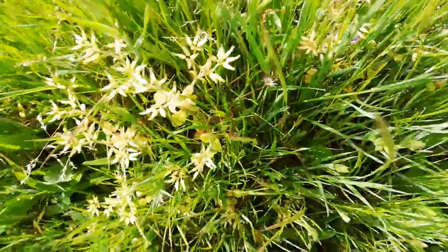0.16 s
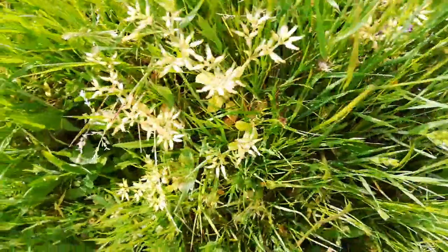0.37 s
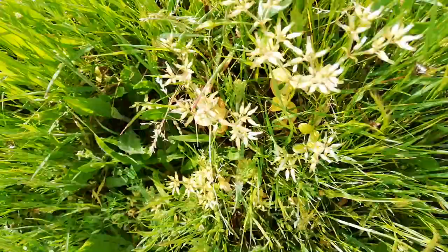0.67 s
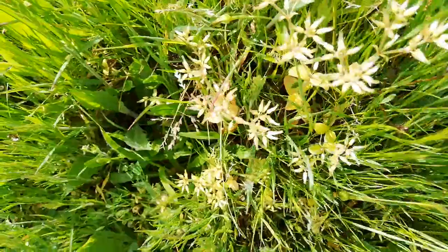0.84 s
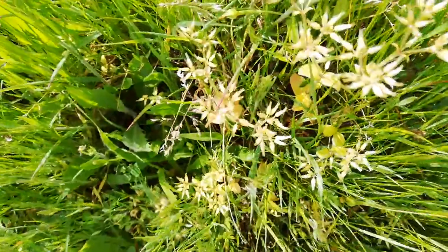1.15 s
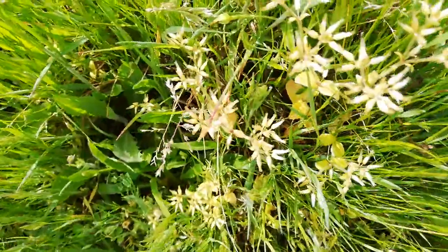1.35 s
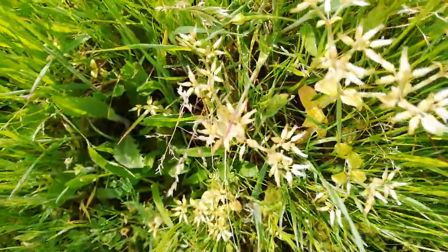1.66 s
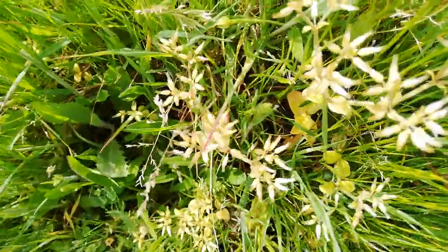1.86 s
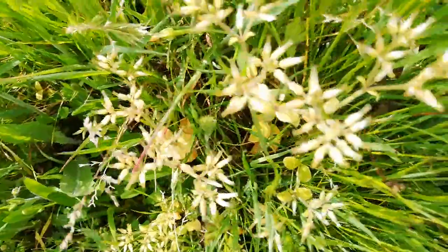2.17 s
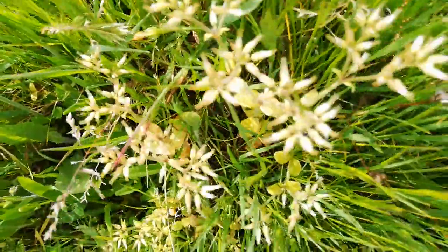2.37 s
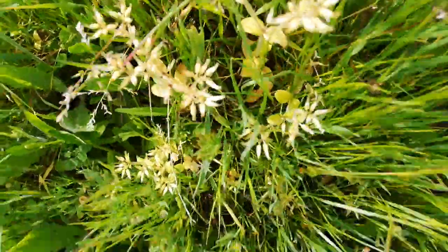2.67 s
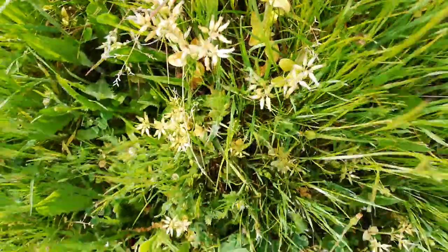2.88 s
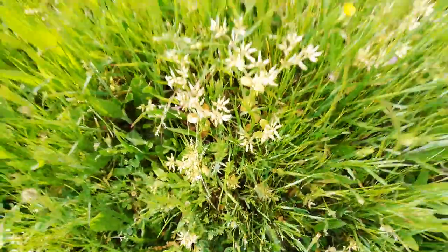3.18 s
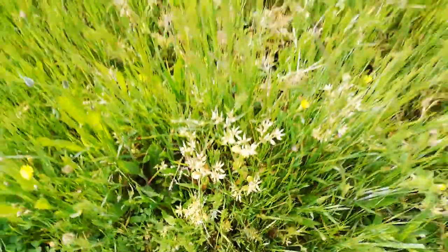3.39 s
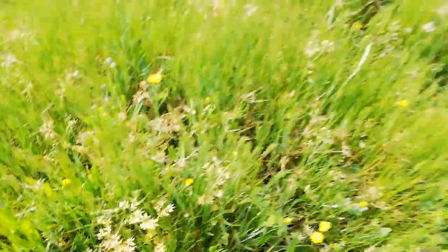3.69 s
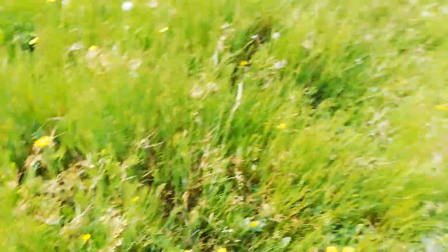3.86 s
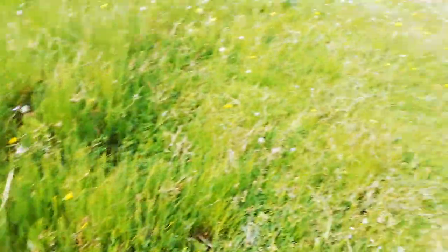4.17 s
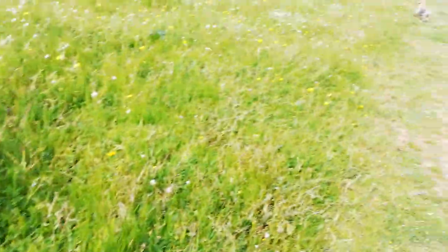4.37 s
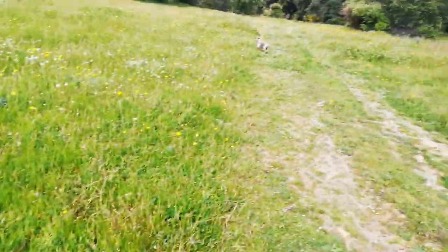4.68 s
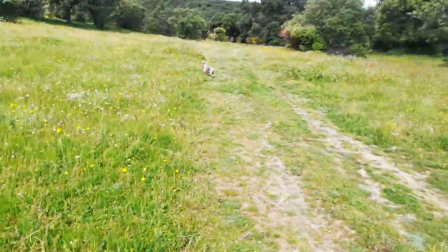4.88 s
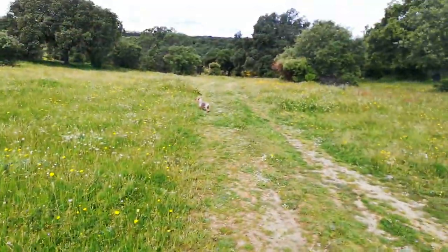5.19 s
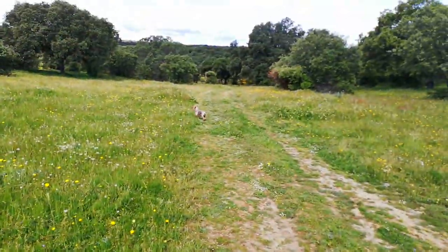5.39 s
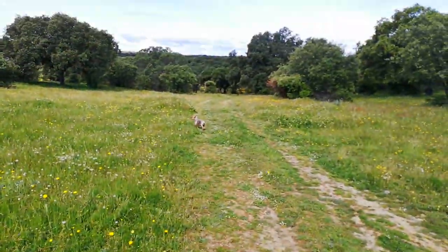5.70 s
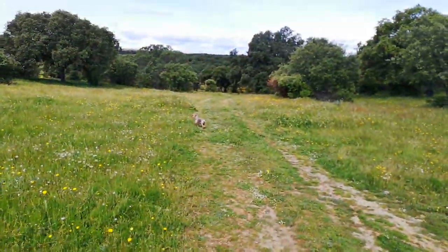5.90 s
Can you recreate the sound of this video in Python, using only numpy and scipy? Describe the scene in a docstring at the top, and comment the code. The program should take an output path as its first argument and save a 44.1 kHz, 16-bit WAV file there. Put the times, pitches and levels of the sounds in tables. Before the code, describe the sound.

In an open meadow, several nearby crickets give quick, overlapping high chirps above a shimmering distant chorus. Wind rumbles and flaps against the microphone, dropping briefly around two seconds. Near the middle, grass swishes with a small knock and a deep thump as the microphone turns. Then the wind mostly fades, the crickets become louder, and faint birds whistle far away.

```python
"""A meadow: field crickets sing all over it, each chirp a few wing strokes, each stroke a falling tone near 5
kHz. Near singers, scattered by the grass, stand out of a distant chorus of many such strokes. Wind is shaped
noise that buffets the microphone, with slaps; a few soft low thuds come apart from it; far birds whistle in
bent sines. The grass swishes twice in crackling noise as someone turns in it, with one soft knock, over a faint
hiss."""
import sys
import numpy as np
from scipy import signal
from scipy.fft import rfft, irfft, next_fast_len
from scipy.io import wavfile
from scipy.ndimage import map_coordinates

SR = 44100
rng = np.random.default_rng(int(sys.argv[2]) if len(sys.argv) > 2 else 0)


def bounce(signal):
    """Save signal as a 16-bit WAV file at the path given by the first command-line argument."""
    frames = np.transpose(np.atleast_2d(signal))
    limited = np.clip(frames, -1, 1)
    pcm = np.round(limited * 32767).astype(np.int16)
    wavfile.write(sys.argv[1], SR, pcm)


N = 266540

# level of the far crickets' tones, which the hiss partly follows: time_s, level_db
CHORUS_LEVEL = [(0.0, -42.5), (.8, -45), (1.9, -47.5), (3.2, -45.5), (4.35, -33.5), (4.65, -39), (5.1, -36),
                (5.55, -37.5), (5.68, -43), (6.04, -34.5)]


def amp(db):
    """Decibels to gain."""
    return 10 ** (np.asarray(db) / 20)


def unit(x):
    """Scale to rms 1."""
    return x / np.sqrt(np.mean(x ** 2) + 1e-20)


def curves(rows):
    """One value per sample for each column after the time."""
    time_s, *columns = np.transpose(rows)
    return [np.interp(np.arange(N) / SR, time_s, column) for column in columns]


def wobble(rate_hz):
    """A smooth random curve with rate_hz knots a second."""
    knots = rng.standard_normal(int(N * rate_hz / SR) + 4)
    return map_coordinates(knots, [np.arange(N) * rate_hz / SR])


def swell_at(middle_s, width_s):
    """A Gaussian rise to 1 and fall; width_s is its standard deviation."""
    return np.exp(-.5 * ((np.arange(N) / SR - middle_s) / width_s) ** 2)


def filtered(x, response):
    """Multiply the spectrum of x by a response of frequency in Hz."""
    size = next_fast_len(N + SR // 2)
    gain = response(np.fft.rfftfreq(size, 1 / SR))
    return irfft(rfft(x, size) * gain, size)[..., :N]


def noise(spectrum, alike):
    """Stereo noise of rms 1; alike runs from -1 (opposed) to 1 (mono)."""
    knot_hz, knot_db = np.transpose(spectrum)

    def response(hz):
        return amp(np.interp(np.log(hz + 1), np.log(knot_hz), knot_db))

    common, side = filtered(rng.standard_normal((2, N)), response)
    turn = np.arccos(np.clip(alike, -1, 1)) / 2
    return unit(np.cos(turn) * common + np.sin(turn) * np.array([side, -side]))


def add(track, start_s, sound):
    """Mix a sound into a track, cut at the track's ends."""
    start = round(start_s * SR)
    lo, hi = max(start, 0), min(start + sound.shape[-1], N)
    if hi > lo:
        track[..., lo:hi] += sound[..., lo - start:hi - start]


def scattered(x, wet_db, t60_s):
    """The direct sound plus diffuse echoes, different at each ear."""
    t = np.arange(SR // 4) / SR
    tail = rng.standard_normal((2, len(t))) * amp(-60 * t / t60_s)
    paths = amp(wet_db) * tail / np.linalg.norm(tail[0])
    paths[:, 0] += 1  # direct path
    return signal.fftconvolve(np.atleast_2d(x), paths, axes=1)


def stroke(pitch_hz, length_s, fall, sag):
    """Phase and swell of one wing closure: the pitch falls ever faster as the scraper slows along the file."""
    u = np.linspace(-1, 1, int(length_s * SR))
    hz = pitch_hz * (1 - fall * u - sag * u * u * (1 + u))
    phase = 2 * np.pi * np.cumsum(hz) / SR
    return phase, np.cos(np.pi * u / 2) ** 2


def upper_resonance(hz, centre_hz=10230, width_hz=260):
    """The wing radiates its octave best around one frequency."""
    return 1 / np.hypot(1, (hz - centre_hz) / width_hz)


def flutter(size, rate_hz=330):
    """The scraper's grip varies within a stroke: a smooth random curve."""
    return map_coordinates(rng.standard_normal(32), [np.arange(size) * rate_hz / SR], mode="mirror")


def chirp(count, period_s, pitch_hz, octave_db, third_db, rasp_db, length_s=.026):
    """A few strokes, the first usually weaker; the wing adds overtones and the file a faint rasp."""
    song = np.zeros((2, SR // 4))
    lead = rng.normal(0.73, 0.4) * np.array([[1], [-1]])  # phase offset between the ears, radians
    file_band = signal.butter(2, [6200, 8800], "bandpass", fs=SR)
    for k in range(count):
        stroke_hz = pitch_hz * (1.0096 + rng.normal(0, 0.0046))
        phase, swell = stroke(stroke_hz, length_s, fall=0.0712, sag=0.048)
        hz = np.gradient(phase) * SR / (2 * np.pi)
        grip_db = 1.4 * flutter(len(phase))
        phase = phase + .3 * flutter(len(phase))
        tone = np.sin(phase + lead)
        octave_gain = amp(octave_db + grip_db) * upper_resonance(2 * hz, width_hz=190)
        octave = octave_gain * np.sin(2 * phase + lead)
        third = amp(octave_db + third_db) * np.sin(3 * phase + lead)
        scrape = signal.lfilter(*file_band, rng.standard_normal((2, len(phase))))
        rasp = amp(octave_db + rasp_db + 2 * grip_db) * scrape
        size = amp(-5 * (k == 0) + rng.normal(2.28, 1.0) + grip_db) * np.sqrt(2)
        add(song, k * period_s, size * swell * (tone + octave + third + rasp))
    return song


def near_crickets():
    """Each cricket has its pitch and pace; grass scatters its chirps, which shift as the microphone turns."""
    # chirps: first_stroke_middle_s, singer, strokes, level_db (nominal, louder side, before scattering)
    chirps = [(.018, "low", 4, -32.5), (.045, "middle", 3, -30.5), (.21, "low", 3, -34),
              (.247, "middle", 4, -29.5), (.414, "middle", 5, -26.5), (.514, "low", 3, -33),
              (.587, "middle", 4, -26.5), (.697, "low", 4, -30), (.779, "middle", 4, -28),
              (.787, "high", 4, -28), (.954, "low", 3, -32.5), (.98, "high", 4, -24),
              (.983, "middle", 3, -34.5), (1.171, "high", 4, -30.5), (1.172, "low", 3, -29),
              (1.356, "low", 4, -27.5), (1.567, "low", 4, -28), (1.785, "high", 3, -32.5),
              (1.815, "low", 3, -26.5), (1.96, "high", 4, -35), (2.068, "low", 3, -31),
              (2.166, "high", 4, -35), (2.29, "low", 3, -35.5), (2.358, "high", 4, -38),
              (2.489, "middle", 4, -38), (2.521, "low", 3, -35), (2.584, "high", 3, -34.5),
              (2.729, "low", 3, -32.5), (2.773, "high", 3, -31), (2.932, "low", 3, -33.5),
              (3.0, "high", 3, -32.5), (3.02, "middle", 3, -36.5), (3.151, "low", 3, -30),
              (3.26, "middle", 3, -31.5), (3.35, "middle", 4, -32), (3.366, "low", 3, -31),
              (3.448, "high", 3, -36), (3.555, "middle", 4, -25), (3.686, "high", 4, -32.5),
              (3.803, "low", 3, -24), (3.884, "high", 3, -30), (3.983, "low", 4, -26.5),
              (4.11, "high", 3, -27.5), (4.188, "low", 3, -29.5), (4.278, "high", 4, -27),
              (4.406, "middle", 4, -21.5), (4.52, "high", 3, -31.5), (4.687, "middle", 4, -25.5),
              (4.748, "high", 3, -29.5), (4.835, "deep", 4, -30.5), (4.918, "high", 4, -29.5),
              (5.099, "low", 4, -26), (5.146, "high", 3, -29), (5.241, "deep", 4, -28.5),
              (5.337, "middle", 4, -25.5), (5.345, "low", 3, -24.5), (5.454, "deep", 3, -34),
              (5.523, "middle", 4, -25), (5.53, "low", 4, -25), (5.71, "middle", 3, -21.5),
              (5.771, "low", 3, -24), (5.857, "middle", 4, -26), (5.941, "high", 4, -22.5)]
    # singers by name: pitch_hz (nominal), stroke_period_s, octave_db (nominal, relative to the tone),
    # left_over_right_db before the turn, left_over_right_db after it
    singers = {"high": (5241.5, .0332, -20.5, 4, -2.5), "middle": (5113.5, .0315, -16.5, -14, -7),
               "low": (5038, .0315, -9.5, 5, -2), "deep": (4899, .028, -5, -3, -6.5)}
    turn_s, turn_length_s = 4.0, 0.52
    # as the microphone swings, the high singer's octave stands out
    lift_s, lift_width_s, peak_lift_db = 4.46, 0.67, 17
    out = np.zeros((2, N))
    lift_db = peak_lift_db * swell_at(lift_s, lift_width_s)
    for s, singer, strokes, db in chirps:
        pitch_hz, period_s, octave_db, before_db, after_db = singers[singer]
        if singer == "high":
            octave_db = octave_db + lift_db[round(s * SR)]
        pan_db = np.interp(s, [turn_s, turn_s + turn_length_s], [before_db, after_db])
        song = chirp(round(strokes), period_s, pitch_hz, octave_db, third_db=-30.5, rasp_db=-18.5)
        sides = amp([[min(pan_db, 0)], [min(-pan_db, 0)]])
        add(out, s - .013, amp(db) * sides * scattered(song, wet_db=-6.0, t60_s=0.05))  # half a stroke early
    return out


def far_crickets(count=11):
    """Many crickets, each with its own pitch and pace, merge into a shimmering band."""
    octave_db = -5.5  # relative to the tones
    tones, octaves = np.zeros((2, N)), np.zeros((2, N))
    for pitch_hz in np.linspace(4620, 5300, count):
        period_s, repeat_s = rng.uniform(.029, .035), rng.uniform(.22, .34)
        for s in np.arange(-rng.uniform(0, repeat_s), N / SR, repeat_s):
            phase, swell = stroke(pitch_hz * rng.normal(1, 0.01034), length_s=0.0222, fall=0.0734, sag=0.057)
            phase = phase + rng.uniform(0, 2 * np.pi, (2, 1))
            tone_size, octave_size = amp(rng.normal(0, 4.8, (2, 2, 1)))
            tone = tone_size * swell * np.sin(phase)
            octave = octave_size * swell ** 2 * np.sin(2 * phase)
            gaps_s = period_s * rng.normal(1, .04, size=4)
            for start_s in s + rng.normal(0, .02) + np.cumsum(gaps_s):
                add(tones, start_s, tone)
                add(octaves, start_s, octave)
    tones = filtered(tones, lambda hz: 1 / np.hypot(1, (hz - 5060) / 450))  # the wing's main resonance
    octaves = filtered(octaves, lambda hz: upper_resonance(hz, width_hz=660))
    tones = unit(scattered(tones, wet_db=-8.5, t60_s=0.041)[:, :N])
    octaves = unit(scattered(octaves, wet_db=-3.5, t60_s=0.034)[:, :N])  # short waves scatter more in grass
    return amp(curves(CHORUS_LEVEL)[0]) * (tones + amp(octave_db) * octaves)


def wind():
    """Slow buffets push both ports together; finer eddies grow faster with wind strength and push in opposition."""
    # breeze at the microphone: time_s, strength_db
    breeze = [(0.0, -29.5), (.4, -27), (1.1, -29.5), (1.7, -33), (1.93, -47.5), (2.47, -50), (2.52, -29.5),
              (2.74, -34.5), (3.05, -33.5), (3.45, -27.5), (3.9, -26), (3.96, -33.5), (4.38, -39),
              (4.55, -56.5), (5.2, -58), (5.48, -83), (6.04, -88)]
    # gusts on top of it: middle_s, width_s, rise_db
    gusts = [(0.222, 0.021, 8.5), (0.336, 0.026, 4.5), (0.773, .03, 2.5), (0.928, 0.024, 3),
             (1.585, 0.016, 4.5), (2.246, 0.032, 9), (2.868, 0.052, 6), (3.161, 0.03, 8),
             (3.423, 0.043, 5.5), (3.872, 0.018, 4.5), (4.223, 0.02, 0.5), (4.38, 0.0099, 11),
             (4.766, 0.021, 16.5), (4.89, 0.044, 16), (5.643, 0.078, 27.5)]
    # buffet spectrum: frequency_hz, density_db (relative)
    buffet_spectrum = [(18, -16), (35, -1), (70, 3), (130, 5.5), (190, -2.5), (260, -15.5), (400, -35.5),
                       (700, -96)]
    # eddy spectrum: frequency_hz, density_db (relative)
    eddy_spectrum = [(90, -56), (170, 1.5), (260, 4), (400, -12.5), (650, -26.5), (1200, -43.5),
                     (2500, -81), (5000, -100)]
    # sudden slaps of wind, peaking 4 ms after time_s: time_s, envelope_peak_db
    slap_peaks = [(0.234, -28.5), (0.517, -40), (0.79, -37.5), (0.925, -32.5), (3.399, -33), (3.462, -34),
                  (3.493, -28), (3.594, -30), (3.864, -44)]
    steady_db = -29.5  # the usual strength
    # levels at the usual strength, and dB gained per dB of wind
    eddy_db, eddy_growth = -38.5, 2
    sway_db, sway_growth = -37.5, 0.41
    body_hz, body_growth = 137, 0.15  # buffets above body_hz grow more: weak wind is duller

    strength_db = curves(breeze)[0] + sum(db * swell_at(s, width_s) for s, width_s, db in gusts)
    excess_db = strength_db - steady_db

    sway_noise = noise([(12, -9), (25, -4), (65, -1), (120, -12), (300, -95)], alike=0.88)
    sway = amp(sway_db + sway_growth * excess_db + 2 * wobble(14)) * sway_noise

    push = noise(buffet_spectrum, alike=0.79)
    deep = filtered(push, lambda hz: 1 / (1 + (hz / body_hz) ** 4))
    body = deep + amp(body_growth * excess_db) * (push - deep)
    buffet = amp(strength_db + 2.56 * wobble(25)) * body

    eddy_level_db = eddy_db + eddy_growth * excess_db + 4.3 * wobble(55)
    eddies = amp(eddy_level_db) * noise(eddy_spectrum, alike=-0.42)

    t = np.arange(N) / SR
    slap_envelope = sum(amp(db) * np.exp(-np.abs(t - s - .004) / 0.0029) for s, db in slap_peaks)
    slap_noise = noise([(100, -19), (280, 6.5), (800, -1), (1400, -21), (3000, -69)], alike=-0.2)
    return sway + buffet + eddies + slap_envelope * slap_noise


def meadow_hiss():
    """Faint shaped noise, wavering and slightly following the far chorus level."""
    # hiss spectrum: frequency_hz, density_db (relative)
    hiss_spectrum = [(30, 6), (120, -28), (300, -1.5), (600, -11), (1200, -5.5), (3000, -6.5), (4200, -5.5),
                     (6000, 3.5), (6800, 1), (7800, -7.5), (11000, 1), (13000, -21), (15500, -6)]
    level_db = -60.5 + 0.21 * (curves(CHORUS_LEVEL)[0] + 46.5) + 1.8 * wobble(12)
    return amp(level_db) * noise(hiss_spectrum, alike=0.039)


def whistle(length_s, first_hz, middle_hz, last_hz):
    """A pure note that bends through three pitches."""
    u = np.linspace(0, 1, int(length_s * SR))
    bend = np.polyfit([0, .5, 1], [first_hz, middle_hz, last_hz], 2)
    phase = 2 * np.pi * np.cumsum(np.polyval(bend, u)) / SR
    return np.sqrt(2) * np.abs(np.sin(np.pi * u)) ** 0.65 * np.sin(phase)


def birds(count=9):
    """Far birds, echoed by the trees: single whistles and a second bird's even run of falling notes."""
    # single whistles: start_s, shape, middle_pitch_hz, level_db (before echoes and side gains)
    whistles = [(.08, "pip", 3570, -64), (.073, "dip", 2290, -67), (.235, "pip", 3860, -61),
                (.335, "dip", 2320, -70), (0.468, "pip", 3870, -58.5), (.499, "pip", 3900, -64),
                (.582, "dip", 2180, -69), (.728, "rise", 2230, -76.5), (2.755, "fall", 2950, -65),
                (3.625, "pip", 3050, -61), (3.7, "rise", 2280, -61), (4.28, "rise", 4060, -54),
                (4.395, "fall", 2720, -53), (4.852, "arch", 3160, -59.5), (5.002, "arch", 3090, -56),
                (5.122, "fall", 1676, -68), (5.148, "arch", 3130, -55.5), (5.27, "fall", 1700, -68),
                (5.291, "arch", 3120, -56)]
    # note shapes by name: length_s, first_pitch_ratio, last_pitch_ratio (both to the middle pitch)
    notes = {"pip": (0.033, 0.95, 1), "dip": (0.0347, 1.18, .97), "fall": (.031, 1.08, 0.82),
             "rise": (.06, .94, 1.22), "arch": (.062, 0.63, .76)}
    run_s, run_period_s, run_db = 5.04, .1045, -63
    song = np.zeros(N)
    for s, shape, hz, db in whistles:
        length_s, first_ratio, last_ratio = notes[shape]
        add(song, s, amp(db) * whistle(length_s, first_ratio * hz, hz, last_ratio * hz))
    for k in range(count):
        add(song, run_s + k * run_period_s, amp(run_db) * whistle(0.026, 3760, 3250, 2550))
    return scattered(song, wet_db=-4, t60_s=.2)[:, :N] * amp([[-4.5], [-.5]])


def grass():
    """Blades brush past each other in two crackling swishes, one crisp and one duller."""
    # swishes: middle_s, width_s, level_db, crispness (0-1)
    swishes = [(4.164, 0.13, -53, 1), (4.942, 0.053, -54, 0)]
    # spectrum of rubbing blades: frequency_hz, density_db (relative)
    blade_spectrum = [(300, -15), (1000, 0.5), (2000, -4.5), (4000, -2), (8000, 2.5), (12000, 1.5),
                      (15500, -8)]
    out = np.zeros((2, N))
    for s, width_s, db, crisp in swishes:
        rub = unit(amp(2.5 * wobble(160)) * noise(blade_spectrum, alike=0.23))
        dull = filtered(rub, lambda hz: 1 / np.hypot(1, hz / 2500))
        out += amp(db) * swell_at(s, width_s) * unit(crisp * rub + (1 - crisp) * dull)
    return out


def knock():
    """One brief hollow tick amid the swishing: a decaying sine with a soft onset."""
    start_s, pitch_hz, level_db, t60_s = 4.21, 1150, -46, .035
    t = np.arange(SR // 10) / SR
    envelope = amp(level_db - 60 * t / t60_s) * (1 - np.exp(-t / 0.0016))
    out = np.zeros(N)
    add(out, start_s, envelope * np.sin(2 * np.pi * pitch_hz * t))
    return out


def bumps(width_cycles=0.34):
    """Each thud is a single low push and pull on both ports."""
    # low thuds: middle_s, pitch_hz, peak_db
    thuds = [(4.376, 61, -15), (4.641, 107, -33), (4.774, 115, -35), (4.939, 113, -34.5), (5.157, 110, -46),
             (5.259, 103, -39)]
    t = np.arange(N) / SR
    out = np.zeros(N)
    for s, hz, db in thuds:
        out += amp(db) * swell_at(s, width_cycles / hz) * np.cos(2 * np.pi * hz * (t - s))
    return out


def scene():
    """Crickets, wind, birds and grass over the faint hiss of the meadow."""
    crickets = near_crickets() + far_crickets()
    air_and_thuds = wind() + bumps() + meadow_hiss()
    return crickets + air_and_thuds + birds() + grass() + knock()


def record(dry):
    """Nothing is kept above the band limit."""
    top_hz = 15850
    return filtered(dry, lambda hz: hz < top_hz)


dry = scene()
out = record(dry)
bounce(out)
```